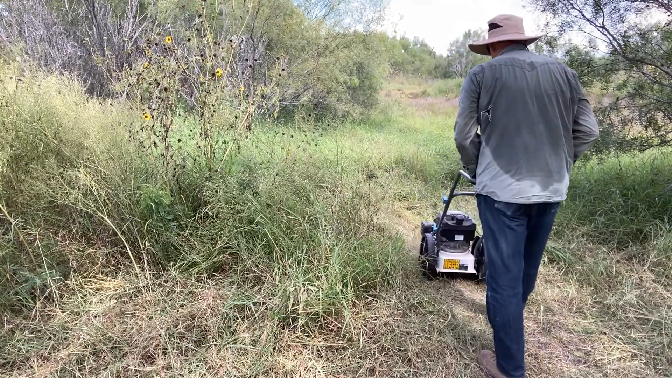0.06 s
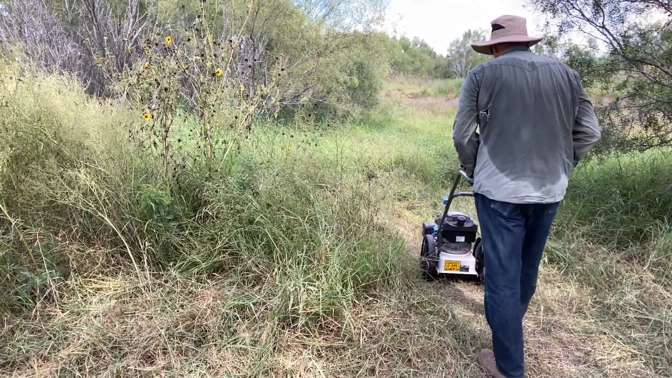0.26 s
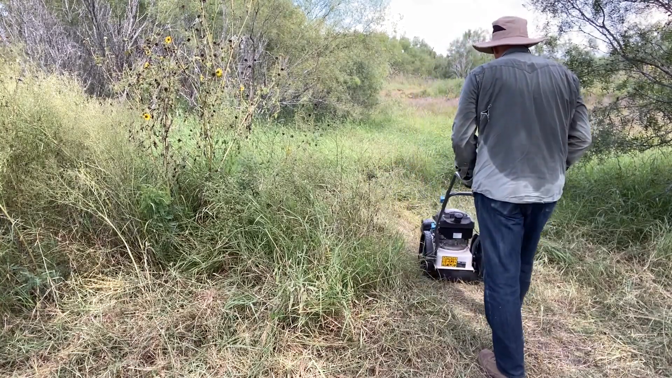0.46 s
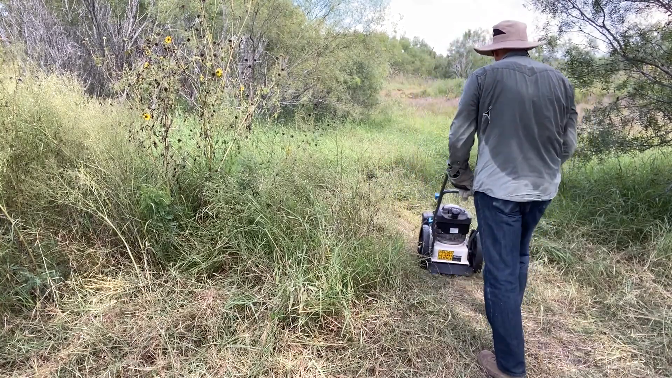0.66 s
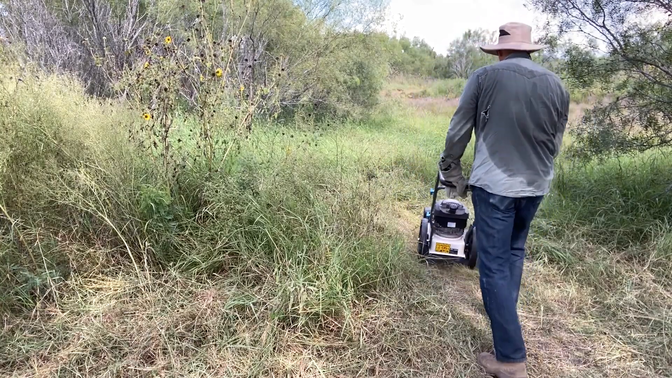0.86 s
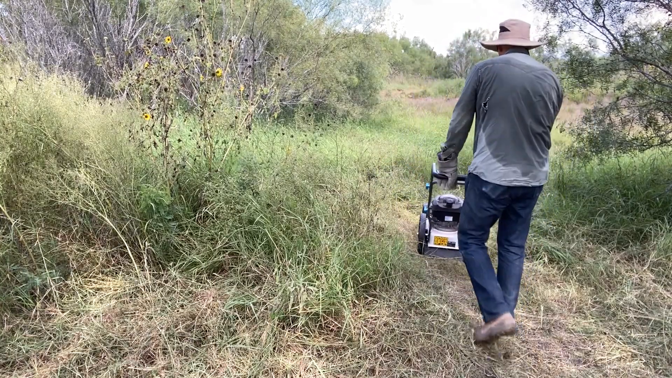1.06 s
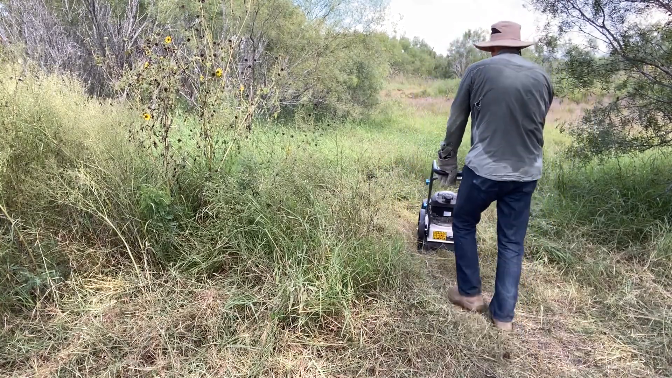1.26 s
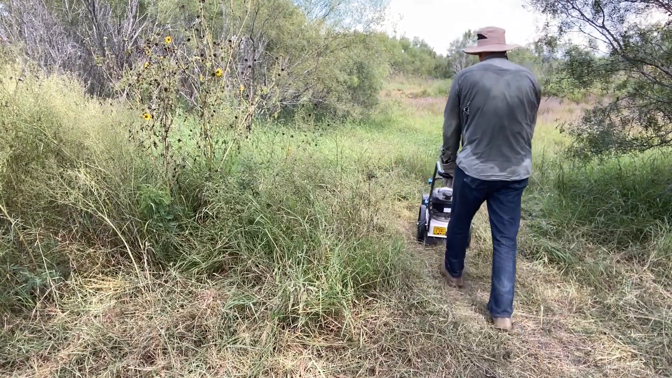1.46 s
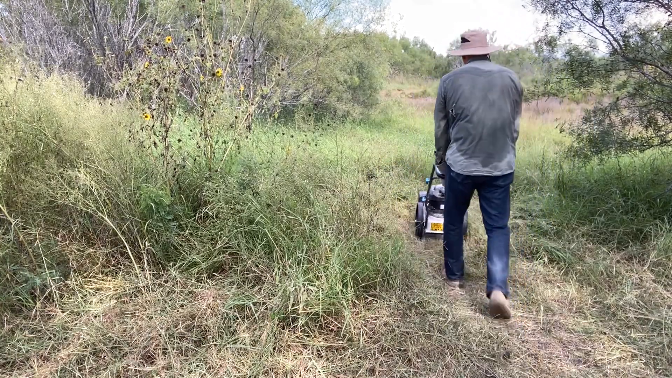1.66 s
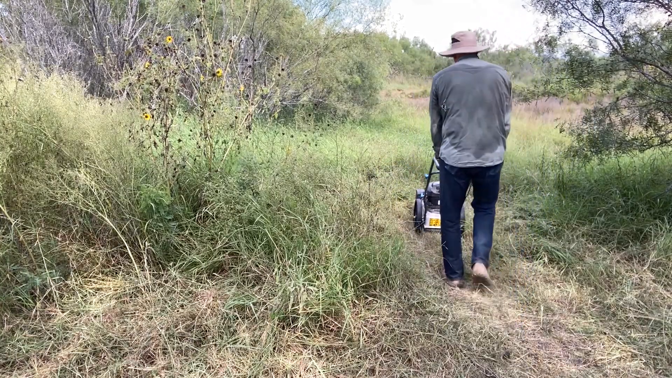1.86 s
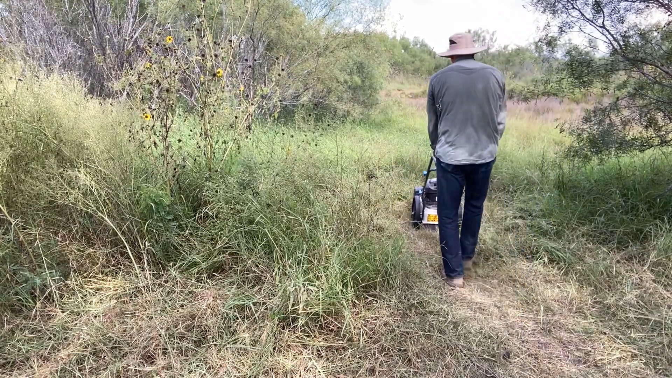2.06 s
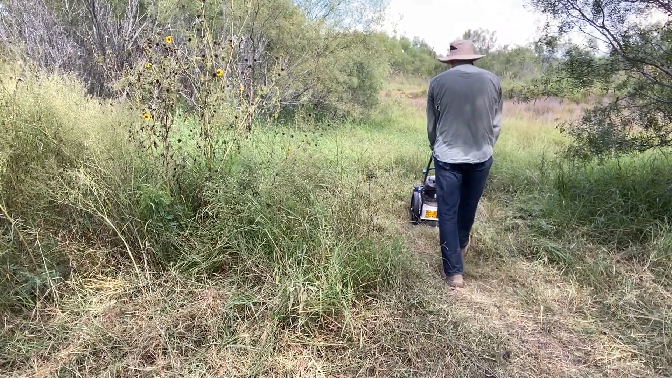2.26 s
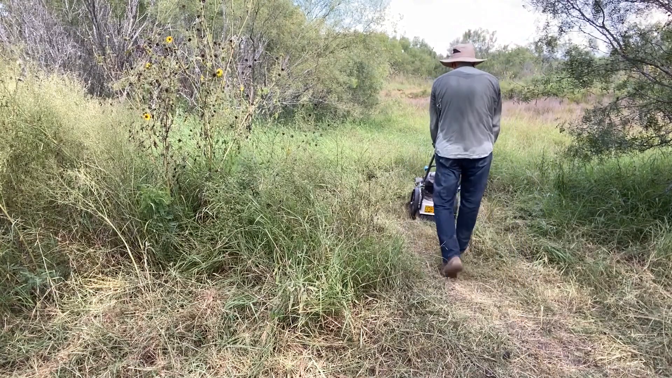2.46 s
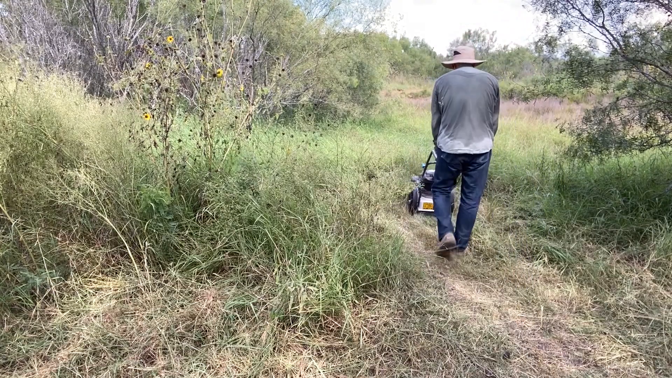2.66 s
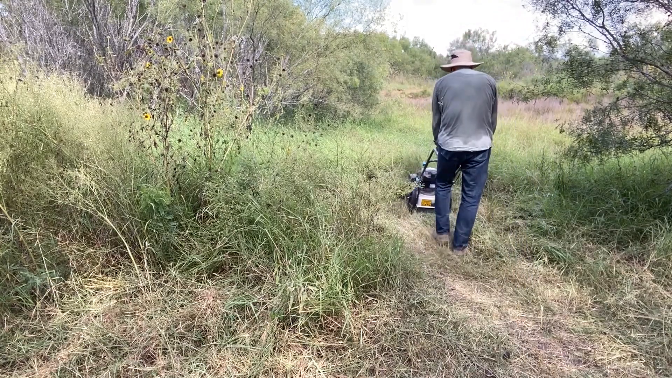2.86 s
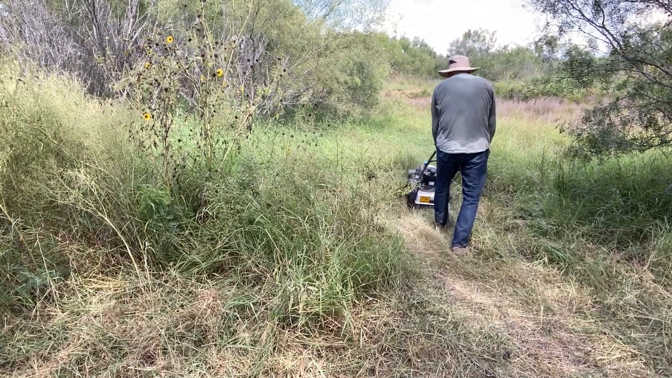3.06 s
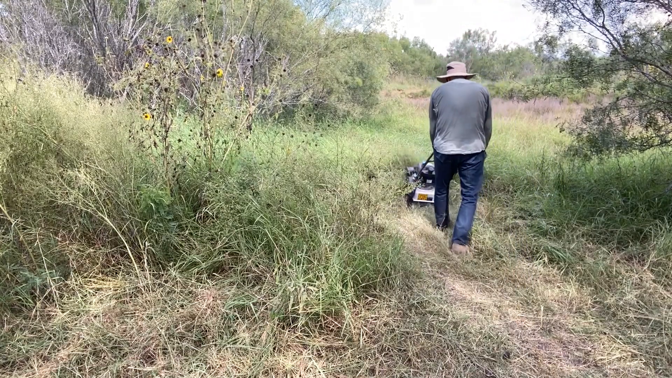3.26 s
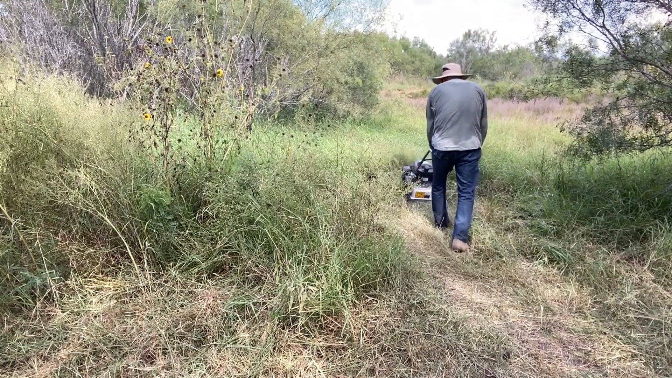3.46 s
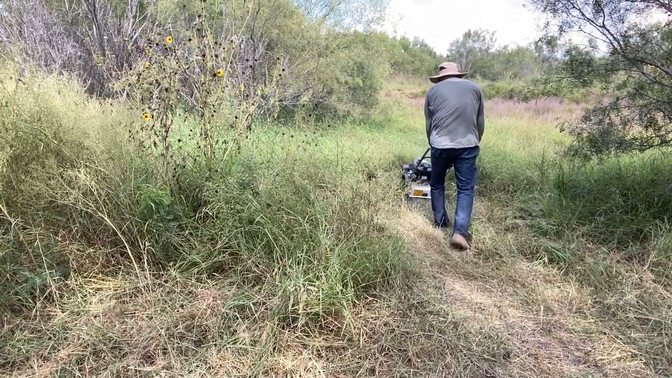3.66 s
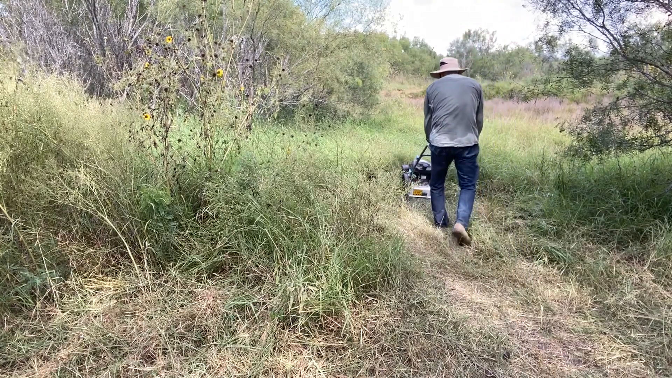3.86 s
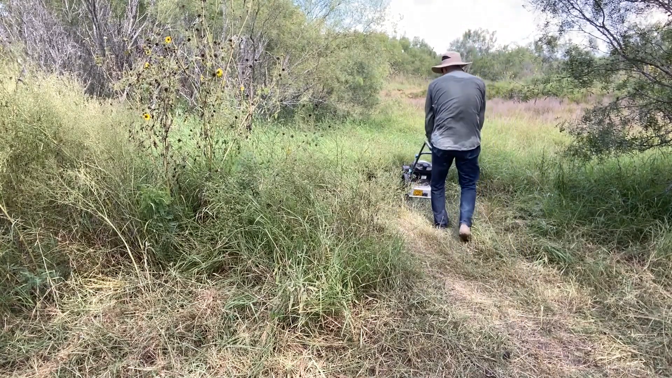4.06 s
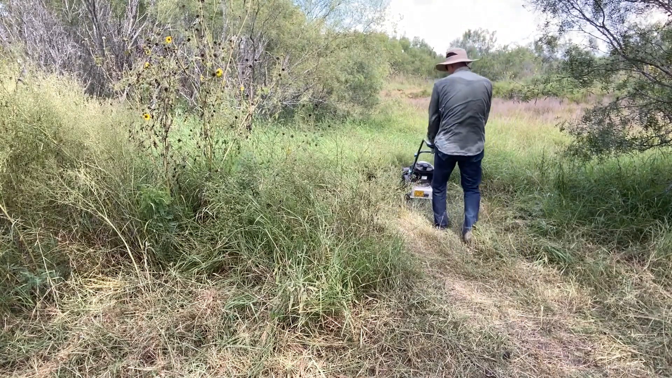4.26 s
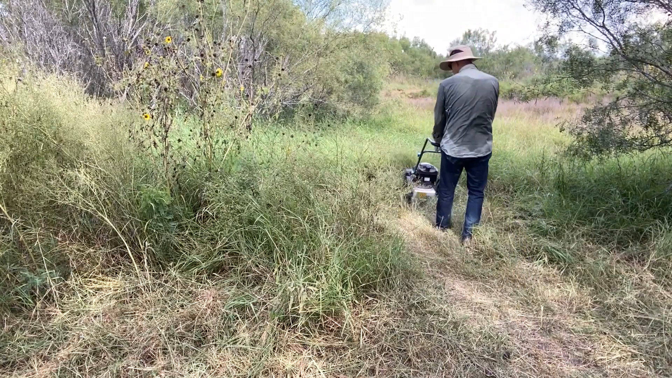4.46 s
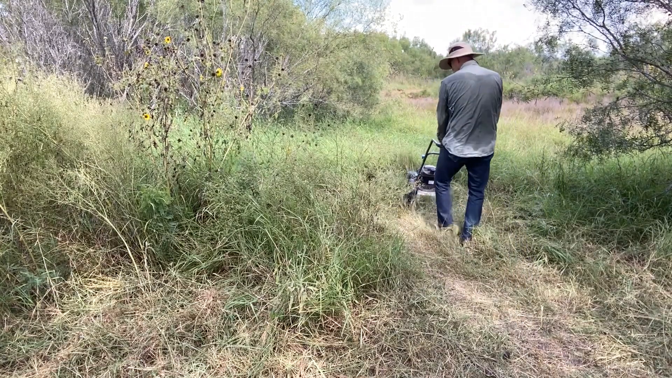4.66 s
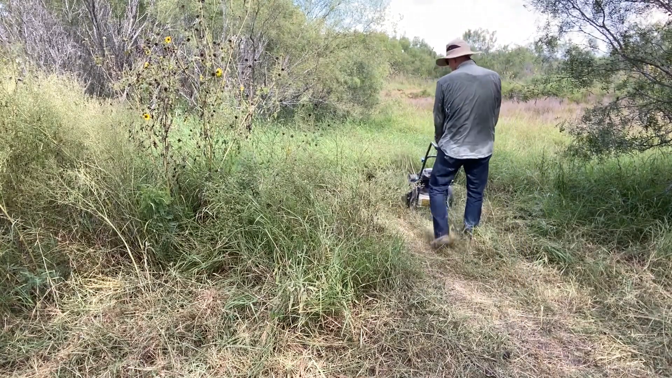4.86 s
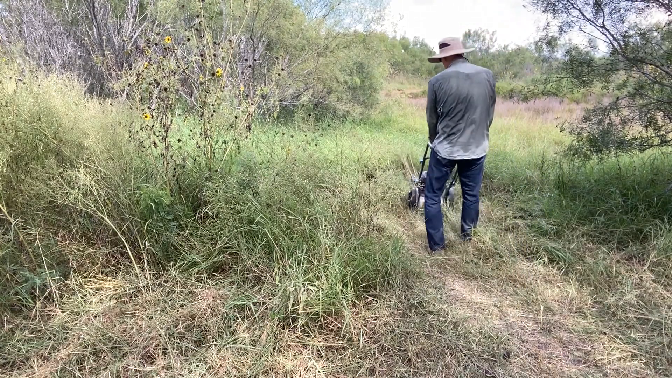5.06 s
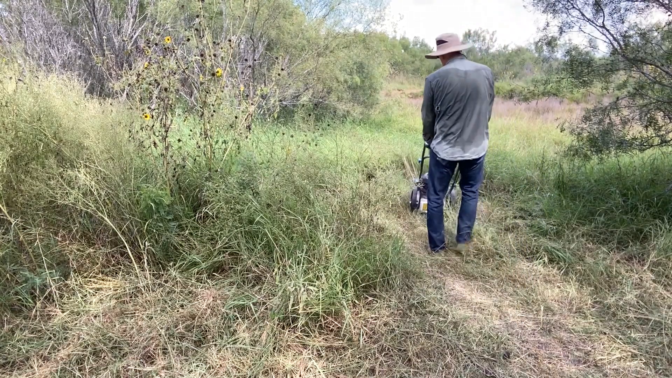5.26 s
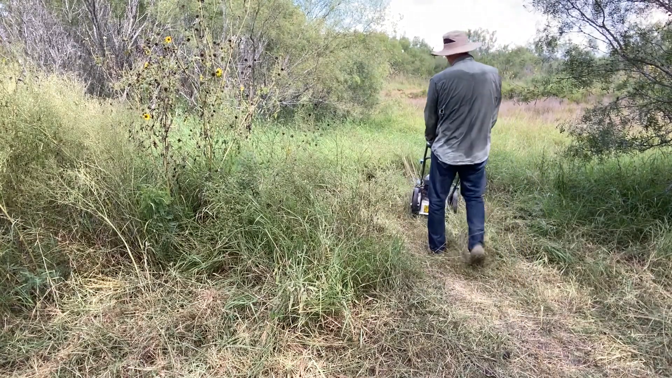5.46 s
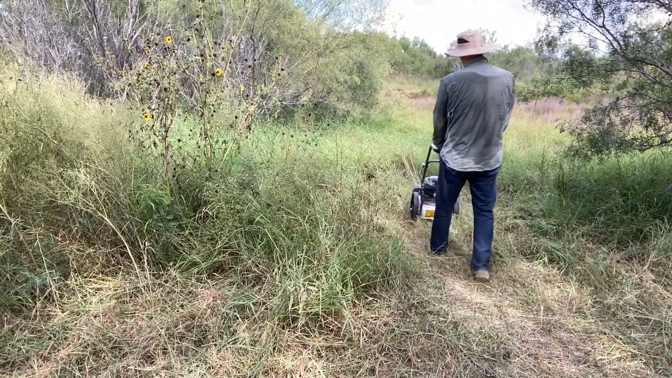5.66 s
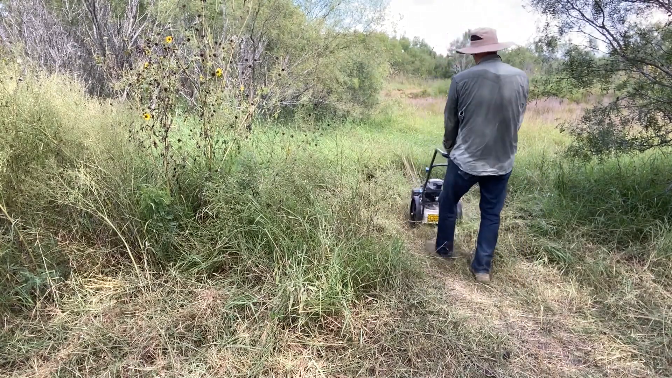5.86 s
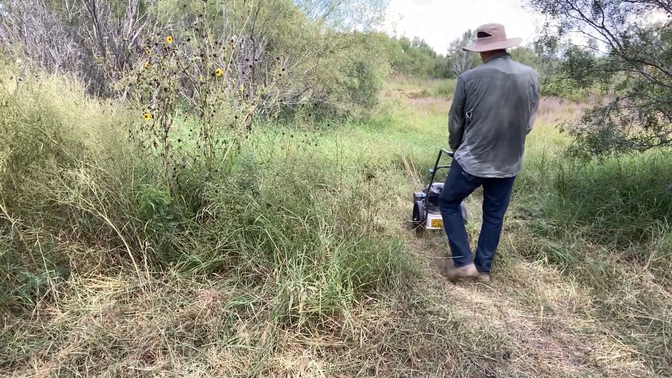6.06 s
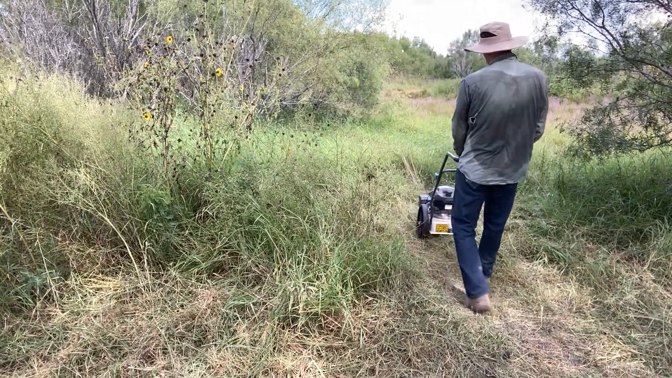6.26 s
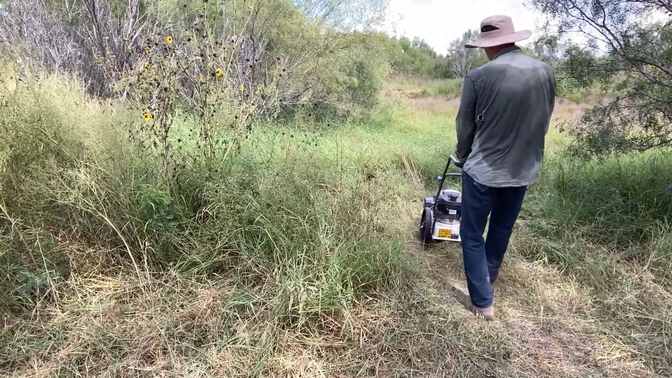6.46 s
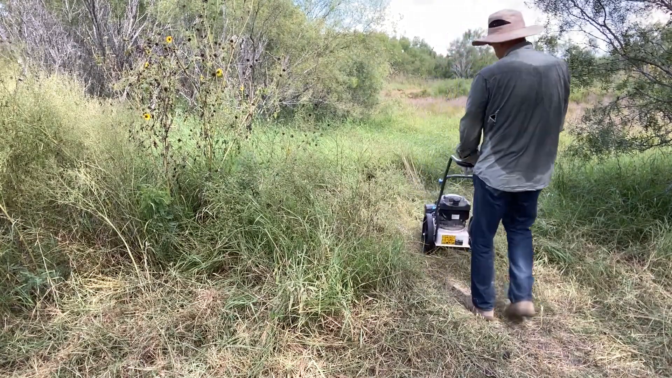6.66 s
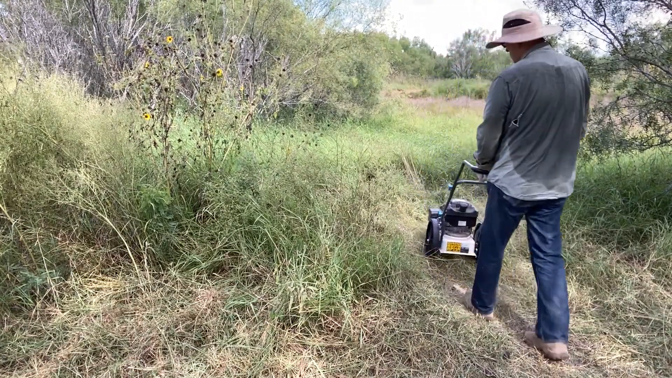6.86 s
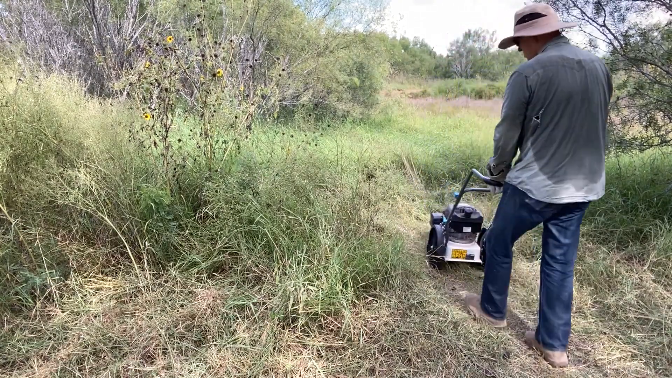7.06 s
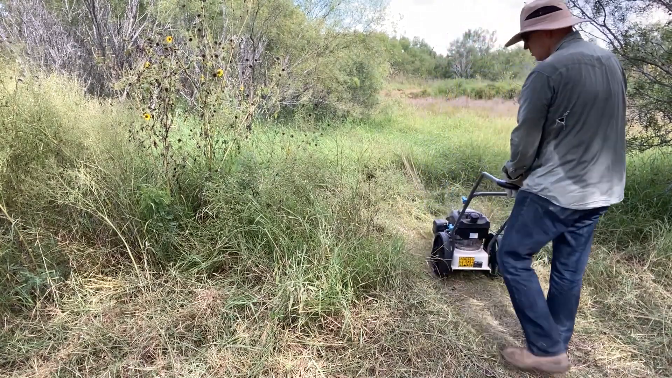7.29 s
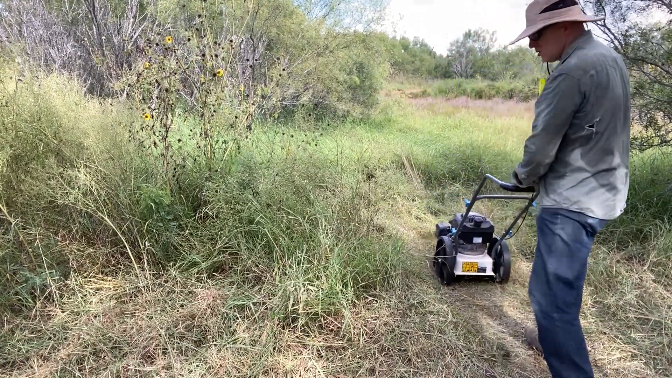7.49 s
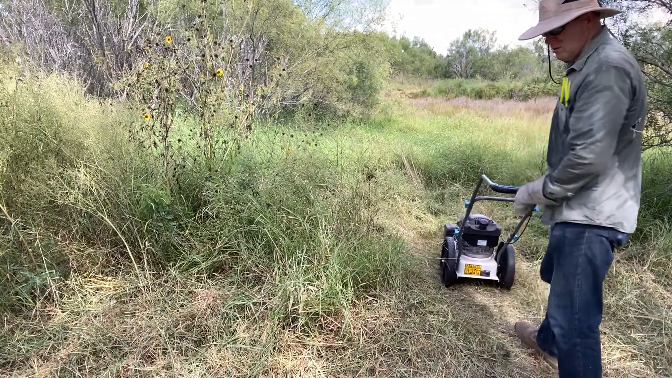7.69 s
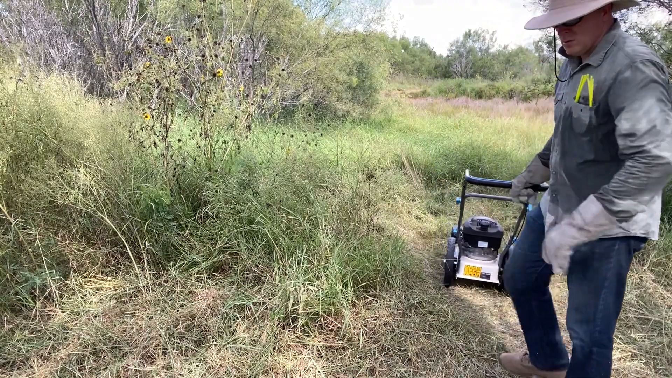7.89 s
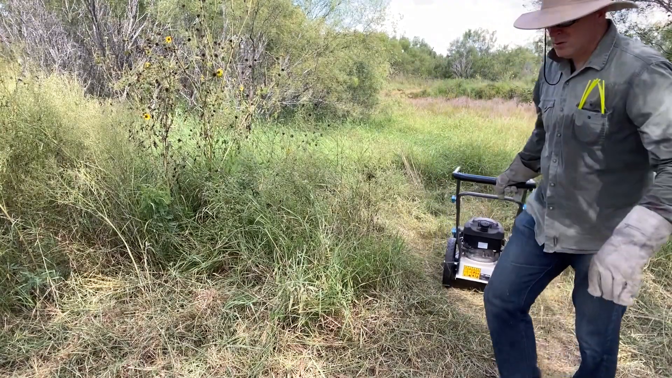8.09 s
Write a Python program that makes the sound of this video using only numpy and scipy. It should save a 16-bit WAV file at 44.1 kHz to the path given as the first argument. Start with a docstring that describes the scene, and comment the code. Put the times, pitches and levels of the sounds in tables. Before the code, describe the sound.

Wheeled string trimmer outdoors: rough puttering engine with misses and pops, metallic clatter, whirring hiss and an early stalk whack, receding and returning.

```python
"""A four-stroke single barks and hunts over hissing, tearing grass: a wheeled string trimmer works in the open.
It is pushed a few metres into tall grass and pulled back, fading and swelling. Gas surges ring the muffler
and air box; some firings miss or pop, others bark. Valve gear and piston knock on the block, loose metal chinks.
The whirling line is coloured noise: it hisses, tears tufts at first and whacks a few stalks.
Left and right differ in phase and level by pitch, with a faint scattered tail."""
import sys
import numpy as np
from scipy import signal
from scipy.fft import rfft, irfft, next_fast_len
from scipy.io import wavfile

SR = 44100
rng = np.random.default_rng(int(sys.argv[2]) if len(sys.argv) > 2 else 0)


def inscribe(sig):
    """Save sig as 16-bit PCM at rate SR to the path in sys.argv[1].

    A 1-D sig is mono; a 2-D sig holds one channel per row.
    Samples are clipped to [-1, 1] before scaling.
    """
    pcm = np.round(np.clip(np.atleast_2d(sig).T, -1, 1) * 32767)
    wavfile.write(sys.argv[1], SR, pcm.astype(np.int16))


N = 358533
TIME = np.arange(N) / SR
SIZE = next_fast_len(N + SR // 2)
FREQS = np.arange(SIZE // 2 + 1) * SR / SIZE


def undb(db):
    """Decibels to gain."""
    return 10 ** (np.asarray(db) / 20)


def unit(x):
    """Scale to rms 1."""
    return x / np.sqrt(np.mean(x ** 2))


def curve(table, axis=1):
    """One column of a timed table at every sample."""
    rows = np.array(table, float)
    return np.interp(TIME, rows[:, 0], rows[:, axis])


def spectrum(points):
    """dB at every frequency, straight between the points on a log axis."""
    hz, db = np.transpose(points)
    return np.interp(np.log(FREQS + 1), np.log(hz), db)


def colour(x, db):
    """Causal minimum-phase filter with the given dB response, by folding the cepstrum."""
    cepstrum = irfft(np.log(undb(db)), SIZE)
    cepstrum[1:SIZE // 2] *= 2
    cepstrum[SIZE // 2 + 1:] = 0
    response = np.exp(rfft(cepstrum))
    return irfft(rfft(x, SIZE) * response, SIZE)[:N]


def walk(knots_per_s):
    """Random drift: straight lines between normal draws."""
    knots = rng.standard_normal(1024)
    return np.interp(TIME * knots_per_s, np.arange(len(knots)), knots)


def strike(times, sizes, ring):
    """Sound the same ring at each time."""
    at = np.round(times * SR).astype(int)
    inside = (at > 0) & (at < N - 1)
    hits = np.bincount(at[inside], sizes[inside], N)
    return signal.fftconvolve(hits, ring)[:N]


def crank_times(cycle, degrees):
    """When the crank passes this angle after the exhaust opens; a cycle is two turns."""
    return np.interp(np.arange(-1, 200) + degrees / 720, cycle, TIME)


# machine place: (time [s], nearness [0 far to 1 near])
PLACE = [(0, 1), (1, 0.7), (2, 0.28), (3, 0.026), (4.5, 0.013), (5.7, 0.34), (6.4, 0.54), (7, 0.82),
         (7.85, 1)]
FAR_M, NEAR_M = 6.44, 3.01  # microphone distance at the ends of the push


def nearness_db():
    """Gain over the far end, by inverse distance."""
    return 20 * np.log10(FAR_M / (FAR_M + (NEAR_M - FAR_M) * curve(PLACE)))


# speed sags: (slowest [s], sag [Hz], build-up [s], overshoot [Hz])
SPEED_SAGS = [(.27, 2.22, .05, 1.16), (1.42, 1.07, .28, 0), (1.94, .83, .26, 0), (2.36, 2.25, .1, 1.8),
              (3.15, .32, .21, .87), (3.71, 2.11, .17, 1.79), (4.72, 2.26, .09, 1.86), (5.6, 1.33, .03, 1),
              (6.23, .65, .03, 0), (6.53, .96, .46, 1.95), (7.07, .11, .03, .78), (7.57, .99, .22, .19)]
GOVERNED_HZ, CATCH_S, SETTLE_S, HUNT_HZ = 24.3585, .1193, .529, .75
START_CYCLES = -.667


def firing_rate():
    """Firings per second: the engine sags, the governor catches it, overshoots and hunts back."""
    hz = np.full(N, GOVERNED_HZ)
    for s, sag, build, overshoot in SPEED_SAGS:
        before, after = np.minimum(TIME - s, 0), np.maximum(TIME - s, 0)
        held = np.exp(-(after / CATCH_S) ** 2)
        hunt = np.exp(-after / SETTLE_S) * np.cos(2 * np.pi * HUNT_HZ * after)
        hz += overshoot * (1 - held) * hunt
        hz -= sag * np.exp(before / build) * held
    return hz


# missed or feeble burns, every second firing:
# (time [s], misses [count], pressure as exhaust opens [1 = good burn, below 0 = suction])
WEAK_BURNS = [(.32, 1, -1), (.57, 2, -.95), (1.03, 1, .15), (1.16, 2, .15), (1.37, 1, -1), (1.5, 1, .2),
              (1.58, 1, -.15), (1.75, 2, -.95), (1.91, 1, -.15), (2, 1, -.8), (2.13, 2, -.95),
              (2.34, 1, -1), (2.43, 1, .2), (2.59, 1, -.6), (2.67, 4, .25), (3.09, 1, .2), (3.38, 2, -.95),
              (3.59, 1, 0), (3.68, 1, -.9), (3.72, 1, -.4), (3.77, 1, -.4), (3.89, 2, -.75), (4.1, 3, .35),
              (4.43, 1, .15), (4.56, 1, -.9), (4.64, 2, -.65), (4.78, 1, -.9), (4.9, 1, -.75),
              (4.94, 1, .2), (5.32, 1, .4), (5.52, 1, -1), (5.65, 1, -.45), (5.82, 1, .25), (5.94, 2, .35),
              (6.15, 1, .25), (6.23, 1, -.9), (6.28, 2, -.7), (6.49, 1, -1), (6.53, 1, -.3), (6.78, 2, .3),
              (6.94, 1, -.85), (7.03, 1, 0), (7.28, 1, -1), (7.36, 2, .15), (7.53, 1, -.9), (7.57, 1, .2),
              (7.66, 1, -.3)]
BURN_DB_PER_HZ, BURN_LAG_S = -0.3, 0.045  # burns weaken with speed, a little later


def burns(opens, excess_hz, scatter_db=.9, seesaw=.6, rebound_db=.8):
    """Firing pressure: strong and weak burns tend to alternate; fuel left by a miss feeds the next burn."""
    chance = signal.lfilter([1], [1, seesaw], rng.standard_normal(len(opens)))
    speed_db = BURN_DB_PER_HZ * np.interp(opens - BURN_LAG_S, TIME, excess_hz)
    pressure = undb(speed_db + scatter_db * np.minimum(chance, .5))
    for s, count, weak in WEAK_BURNS:
        missed = np.argmin(abs(opens - s)) + 2 * np.arange(count)
        pressure[missed] = weak
        pressure[missed + 1] *= undb(rebound_db)
    return pressure


EASE_DB = 1  # lost per firing within a bout


def bouts(opens, table):
    """Strength in each cycle of a special kind of firing; it eases off through each bout."""
    drive = np.zeros(len(opens))
    for s, count, step, db in table:
        later = np.arange(count)
        drive[np.argmin(abs(opens - s)) + step * later] = undb(db - EASE_DB * later)
    return drive


def surges(cycle, table, drive, late_deg, surge_db=.4, wobble_deg=1):
    """Gas surges at set crank angles sound decaying rings, as hard as each cycle drives them."""
    age, out = TIME[:SR // 10], 0
    for degrees, hz, decay, db, sign in table:
        chance = rng.standard_normal((2, len(drive)))
        ring = np.sign(sign) * np.exp(-age / decay) * np.sin(2 * np.pi * hz * age)
        times = crank_times(cycle, degrees + late_deg + wobble_deg * chance[0])
        out = out + strike(times, drive * undb(db + surge_db * chance[1]), ring)
    return out


# hard burns as the governor opens the throttle: (time [s], firings [count], step [cycles], level [dB])
HARD_FIRINGS = [(.53, 2, 2, 0), (.78, 4, 1, -6), (2.63, 4, 2, 1), (3.93, 1, 1, 0), (4.06, 5, 2, -3),
                (4.98, 7, 1, 0), (6.74, 5, 2, 1.5)]
# unburnt fuel pops in the muffler: (time [s], pops [count], step [cycles], level [dB])
MUFFLER_POPS = [(1.37, 1, 1, 0), (2, 1, 1, 0), (2.38, 1, 1, -3), (2.59, 1, 1, -3), (3.38, 2, 2, 0),
                (3.72, 2, 1, -2), (3.89, 1, 1, -4), (4.56, 3, 2, -1)]
# gas surges, five tables alike:
# (angle after exhaust opens [crank deg], ring [Hz], decay [s], relative level [dB], push +1 or suck -1)
BLOW_SURGES = [(1.86, 401, 0.0039, -25, 1), (38, 512, 0.0093, -38, 1), (26.4, 158, 0.0027, -15.5, -1),
               (148.3, 35.4, 0.0056, -12, -1)]
SUCK_SURGES = [(74, 59.5, 0.0054, -9.5, -1), (9, 41.4, 0.023, -19.5, 1)]
BARK_SURGES = [(-8, 386, 0.0028, -19, 1), (12.5, 186, 0.0035, -16.5, -1), (122, 37, 0.0035, -11, -1)]
POP_SURGES = [(3, 340, 0.0011, -19, -1), (26, 245, 0.0016, -14.5, 1)]
INTAKE_SURGES = [(182.9, 411.5, 0.0033, -20.5, 1), (168, 433, 0.0017, -25, 1),
                 (231.8, 92, 0.0037, -11.5, 1), (256.5, 57, 0.0073, -19, -1)]
# exhaust colour: (frequency [Hz], level [dB])
EXHAUST_COLOUR = [(26, -3), (42, 0), (110, -0.5), (175, 2.5), (245, 0.5), (295, 3.5), (390, 2), (520, -1),
                  (680, -4), (1200, -15), (4000, -11.5)]
GULP_DB_PER_HZ, LATE_DEG_PER_HZ = -0.5, 2.85  # at speed: weaker gulps, later gas
OUTLET_HZ = 42


def exhaust(cycle, excess_hz, burn_db=0.3, suck_db=0.3, bark_db=0.3, pop_db=0.3, wander_deg=1.5):
    """Good burns blow out, hard ones bark; misses suck back, some pop; the intake gulps each cycle."""
    opens = crank_times(cycle, 0)
    pressure, excess = burns(opens, excess_hz), np.interp(opens, TIME, excess_hz)
    late_deg = LATE_DEG_PER_HZ * excess + wander_deg * rng.standard_normal(len(opens))
    hard = bouts(opens, HARD_FIRINGS)
    # a quick bark takes the place of the slow blow
    blow = undb(burn_db) * np.maximum(pressure, 0) * np.maximum(1 - hard, 0)
    suck = undb(suck_db) * np.maximum(-pressure, 0)
    pop = undb(pop_db) * bouts(opens, MUFFLER_POPS)
    out = surges(cycle, BLOW_SURGES, blow, late_deg)
    out += surges(cycle, SUCK_SURGES, suck, late_deg)
    out += surges(cycle, BARK_SURGES, undb(bark_db) * hard, late_deg)
    out += surges(cycle, POP_SURGES, pop, late_deg)
    out += surges(cycle, INTAKE_SURGES, undb(GULP_DB_PER_HZ * excess), 0)
    outlet = signal.butter(3, OUTLET_HZ, "high", fs=SR, output="sos")
    return unit(colour(signal.sosfilt(outlet, out), spectrum(EXHAUST_COLOUR)))


# puff turbulence colour: (frequency [Hz], level [dB])
GAS_COLOUR = [(20, -33.5), (50, -8), (110, -3), (220, -1), (450, -14.5), (650, -37), (1500, -35)]


def gas(cycle, fade_cycles=0.89):
    """Turbulence in each puff: noise that fades through every cycle."""
    puff = np.exp(-(cycle % 1) / fade_cycles)
    return unit(colour(rng.standard_normal(N) * puff, spectrum(GAS_COLOUR)))


# ringing parts of deck and shroud: (frequency [Hz], width [Hz], boost [dB])
PANEL_RINGS = [(519, 94, 4.5), (725, 51, 4), (1001, 15, 6.5), (1185, 24, 4.5), (1718, 110, 8.5),
               (2206, 220, 5), (4240, 110, 2), (4980, 160, 12.5), (6440, 440, 10), (7070, 510, 8)]


def panels():
    """dB response of the ringing sheet metal."""
    return sum(db / (1 + (2 * (FREQS - hz) / width) ** 2) for hz, width, db in PANEL_RINGS)


# valve and piston knocks: (angle [crank deg], relative level [dB], treble tilt [dB per octave])
BLOCK_KNOCKS = [(121.5, -1, 5.5), (183.1, -7.5, -3.5), (434.4, -3, 10), (488.2, 0, 10.5), (579.2, -5.5, -3),
                (683.7, 0, 8.5)]
# block colour: (frequency [Hz], level [dB])
BLOCK_COLOUR = [(250, -24), (420, 0), (520, -2.5), (620, -6), (730, -6), (860, -0.5), (1030, -1.5),
                (1300, -6), (1520, -5), (1720, -10.5), (2000, -12.5), (2600, -14.5), (3500, -21),
                (6000, -39.5)]
# bright ticking colour: (frequency [Hz], level [dB])
TICK_COLOUR = [(1500, -31.5), (2200, 0.5), (3200, -0.5), (4400, 3), (5500, -12.5), (9000, -29),
               (15000, -29)]


def clatter(cycle, decay_s=0.007, scatter_db=1.94, play_deg=0.4, rattle_db=-4, fan_db=-5,
            alike_hz=1700, tick_db=-17, shade_db=5):
    """Valves and piston knock: alike per cycle in the middle, loose rattle above, over the fan's rush."""
    age = TIME[:SR // 25]
    fade, out, ticks = np.exp(-age / decay_s), 0, 0
    octaves = np.log2(np.clip(FREQS, 600, 2400) / 1200)
    dull = signal.butter(8, alike_hz, fs=SR, output="sos")
    for degrees, db, tilt_db in BLOCK_KNOCKS:
        chance = rng.standard_normal((2, len(crank_times(cycle, 0))))
        times = crank_times(cycle, degrees + play_deg * chance[0])
        sizes = undb(db + scatter_db * chance[1])
        alike = strike(times, sizes, signal.sosfilt(dull, fade * rng.standard_normal(len(age))))
        loose = strike(times, sizes, fade) * rng.standard_normal(N)
        knock = alike + undb(rattle_db) * loose
        out = out + colour(knock, tilt_db * octaves - abs(tilt_db) / 2)
        ticks = ticks + loose
    fan = undb(fan_db) * rng.standard_normal(N)
    # tall grass shades the ticking when the machine is deep in it
    ticking = unit(colour(ticks, spectrum(TICK_COLOUR))) * undb(tick_db + shade_db * curve(PLACE))
    return unit(colour(unit(out) + fan, spectrum(BLOCK_COLOUR) + panels())) + ticking


# loose metal: (angle [crank deg], ring [Hz], relative level [dB])
METAL_CHINKS = [(124, 5900, 6), (184, 6870, 8.5), (624, 6260, 8)]


def chinks(cycle, decay_s=0.012, width_hz=350, scatter_db=4.0, play_deg=22):
    """Loose metal chinks near the same crank angles, now faintly, now clearly: resonated noise."""
    fade, out = np.exp(-TIME[:SR // 25] / decay_s), 0
    for degrees, hz, db in METAL_CHINKS:
        chance = rng.standard_normal((2, len(crank_times(cycle, 0))))
        times = crank_times(cycle, degrees + play_deg * chance[0])
        hits = strike(times, undb(db + scatter_db * np.minimum(chance[1], 2)), fade)
        resonator = signal.iirpeak(hz, hz / width_hz, fs=SR)
        out = out + signal.lfilter(*resonator, hits * rng.standard_normal(N))
    return unit(out)


def grass(grain_db):
    """Countless tiny snaps of uneven size: noise with a random level every 16 samples."""
    sizes_db = grain_db * np.repeat(rng.standard_normal(N // 16 + 1), 16)[:N]
    return unit(rng.standard_normal(N) * undb(sizes_db))


# hiss colour: (frequency [Hz], level [dB])
HISS_COLOUR = [(1200, -9), (2600.0, 3.5), (3500.0, 5.5), (4400.0, -18.5), (5500.0, 2), (6900.0, -18),
               (8000.0, -2.5), (9200.0, -2), (10500.0, 2), (12200.0, -9.5), (13500.0, -3.5), (15500.0, -6)]


def line_hiss(cycle, whirl_db=1, flicker_db=1, grain_db=0.5):
    """The line whirls through air and leaf tips, three turns to a firing."""
    swing_db = whirl_db * np.cos(6 * np.pi * cycle) + flicker_db * walk(60)
    return unit(colour(grass(grain_db) * undb(swing_db), spectrum(HISS_COLOUR) + panels()))


# tearing colour: (frequency [Hz], level [dB])
TEAR_COLOUR = [(200, -16), (450.0, -4), (650.0, -4.5), (1000.0, -2), (1400.0, -5.5), (2100.0, -12.5),
               (3100.0, -15), (4800.0, -25.5), (6800.0, -18.5), (9000.0, -20), (12000.0, -24),
               (13500.0, -23), (15500.0, -33)]


def tearing(cycle, whirl_db=2, flicker_db=3.0, grain_db=-1.0):
    """Both ends of the line rip into the tuft on every turn."""
    swing_db = whirl_db * np.cos(12 * np.pi * cycle) + flicker_db * walk(91.8)
    return unit(colour(grass(grain_db) * undb(swing_db), spectrum(TEAR_COLOUR)))


# torn tufts: (time [s], hold [s], level [dB], release [s])
TORN_TUFTS = [(-.03, 0.024, -27.5, 0.28), (0.221, 0.071, -26, 0.059), (0.404, 0.13, -39.5, 0.041),
              (.6, 0.21, -44, 0.32)]


def tufts(attack_s=0.02):
    """Strength of the tearing: the line bites into each tuft, holds and runs free."""
    envelope = 0
    for s, hold, db, release in TORN_TUFTS:
        bite = 1 - np.exp(-np.maximum(TIME - s, 0) / attack_s)
        envelope = envelope + undb(db) * bite * np.exp(-np.maximum(TIME - s - hold, 0) / release)
    return envelope


# stalks struck by the line: (time [s], relative level [dB], decay [s])
STRUCK_STALKS = [(0.248, -27, 0.013), (0.2964, -13, 0.0054), (0.2997, -18, 0.0046), (0.307, -32, 0.0041),
                 (0.318, -24.5, 0.012), (1.784, -39, .006), (2.465, -33, 0.0062), (2.515, -45, .008),
                 (3.809, -30.5, 0.0074), (4.815, -33.5, 0.011), (4.868, -42, .007), (5.69, -38, 0.0073),
                 (6.572, -35.5, 0.014), (7.487, -34, 0.0059), (7.578, -35, 0.0055), (7.614, -33.5, 0.0076)]
# stalk colour: (frequency [Hz], level [dB])
STALK_COLOUR = [(200, 4), (450, -30), (1500, 15.5), (3200, 11.5), (5000, 10.5), (8300, 12.5), (10500, 8.5),
                (13500, -0.5), (15500, -1)]
SNAP_GRAIN_DB = 1.8  # spread of snap sizes


def stalks(rise_s=0.00027):
    """A stalk shatters in a short bright burst of uneven snaps."""
    envelope = np.zeros(N)
    for s, db, decay in STRUCK_STALKS:
        age = np.maximum(TIME - s, 0)
        envelope += undb(db) * (1 - np.exp(-age / rise_s)) * np.exp(-age / decay)
    return envelope * unit(colour(grass(SNAP_GRAIN_DB), spectrum(STALK_COLOUR)))


THUD_S, THUD_HALF_S = .293, 0.01  # middle, half length


def thud(level_db=-24, edge_hz=1700, hollow_hz=220):
    """The line slaps dully into the thickest stalk: a short swell of band-passed noise."""
    band = signal.butter(3, [hollow_hz, edge_hz], "band", fs=SR, output="sos")
    body = signal.sosfilt(band, rng.standard_normal(N))
    return undb(level_db) * unit(body) * np.exp(-((TIME - THUD_S) / THUD_HALF_S) ** 2)


# leafy clumps brushed by the line: (time [s], half length [s], hiss swell [dB])
LEAFY_CLUMPS = [(0.447, 0.1, 8.5), (2.454, 0.1, 0), (3.25, 0.93, 2.1), (4.833, 0.14, 3.5),
                (5.763, 0.13, 1.5), (6.593, 0.42, 1.5), (7.58, 0.13, 0)]


def clumps_db():
    """The hiss swells and falls as the line passes each clump."""
    return sum(db * np.exp(-((TIME - s) / length) ** 2) for s, length, db in LEAFY_CLUMPS)


def field(x, scatter_db=-20, decay_s=0.018, count=7):
    """Brush and trees scatter a faint tail, strongest near 4 kHz, different by ear and place."""
    age, out = TIME[:SR // 4], 0
    bright_db = spectrum([(100, 3.7), (500, 5.5), (2000, 10.4), (4000, 14.6), (8000, 0.77), (12000, 1.6)])
    bright = colour(x, bright_db)
    for place in range(count):
        tails = rng.standard_normal((2, len(age))) * np.exp(-age / decay_s)
        tails /= np.linalg.norm(tails[0])
        here = np.sqrt(np.maximum(1 - abs(np.linspace(0, count - 1, N) - place), 0))
        out = out + signal.oaconvolve((bright * here)[None], tails)[:, :N]
    return undb(scatter_db) * out


# stereo image: (frequency [Hz], left lead when far [rad], left lead when near [rad], left minus right [dB])
STEREO_IMAGE = [(0, 0, 0, 2), (150, -.15, -.15, 2.2), (450, -.7, -.8, -.5), (800, -.85, -1.05, -2.8),
                (1200, -.6, -.85, -1), (1700, -1.2, -1.7, 2.2), (2600, -2.2, -2.8, -.5),
                (4500, -3.1, -4, .3), (5500, -3.7, -5, .6), (6900, -5.7, -6.7, 2.6),
                (7700, -5.4, -4.6, 1.5), (8400, -3.6, -3.6, .5), (9500, -3, -3, 0), (11500, -.2, -.2, 0),
                (12400, .2, .2, 0), (14000, 2.9, 2.9, 0)]


def stereo_image(x):
    """Left and right differ in phase and level by pitch; phase shifts with place."""
    hz, far, near, db = np.transpose(STEREO_IMAGE)
    share, out = np.clip(curve(PLACE), 0, 1), 0
    for phase, weight in ((far, 1 - share), (near, share)):
        half = np.exp(.5j * np.interp(FREQS, hz, phase)) * undb(np.interp(FREQS, hz, db) / 2)
        out = out + weight * irfft(rfft(x, SIZE) * np.array([half, 1 / half]), SIZE)[:, :N]
    return out


BLOCK_DB_PER_HZ, HISS_DB_PER_HZ = 1.0, 0.96  # a faster engine knocks louder, whirls the line harder
# at the end the walker steps in front and screens block and hiss
SCREEN_FROM_S, SCREEN_DB_PER_S = 7.93, -14


def scene(exhaust_db=-28.0, gas_db=-39.0, block_db=-37.5, hiss_db=-47.0, tear_db=0, stalk_db=1,
          chink_db=-56, exhaust_spread=0.57, hiss_spread=0.79):
    """One crankshaft times engine and line; block, hiss and puffs grow with nearness, the block most."""
    hz = firing_rate()
    cycle, excess_hz = START_CYCLES + np.cumsum(hz) / SR, hz - GOVERNED_HZ
    near_db, screen_db = nearness_db(), SCREEN_DB_PER_S * np.maximum(TIME - SCREEN_FROM_S, 0)
    puffs = undb(exhaust_db) * exhaust(cycle, excess_hz) + undb(gas_db) * gas(cycle)
    machine = puffs * undb(exhaust_spread * near_db)
    machine += clatter(cycle) * undb(block_db + near_db + screen_db + BLOCK_DB_PER_HZ * excess_hz)
    machine += undb(chink_db) * chinks(cycle)
    hiss_gain_db = hiss_db + hiss_spread * (near_db + screen_db) + HISS_DB_PER_HZ * excess_hz + clumps_db()
    machine += line_hiss(cycle) * undb(hiss_gain_db)
    machine += undb(tear_db) * tearing(cycle) * tufts()
    machine += undb(stalk_db) * stalks() + thud()
    return stereo_image(machine) + field(machine)


TOP_HZ = 15800


def record(dry):
    """The recorder cuts the top with a steep low-pass."""
    return signal.sosfilt(signal.ellip(10, .1, 80, TOP_HZ, fs=SR, output="sos"), dry)


dry = scene()
out = record(dry)
inscribe(out)
```